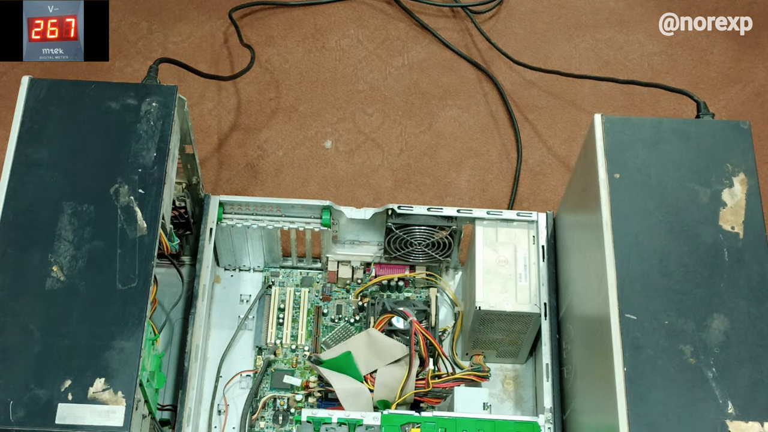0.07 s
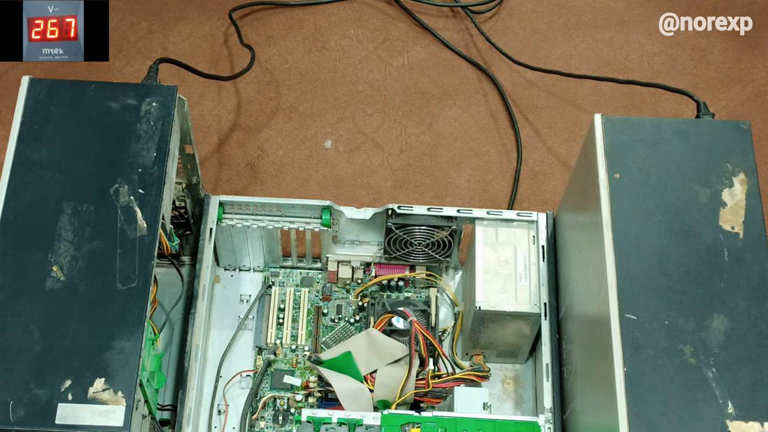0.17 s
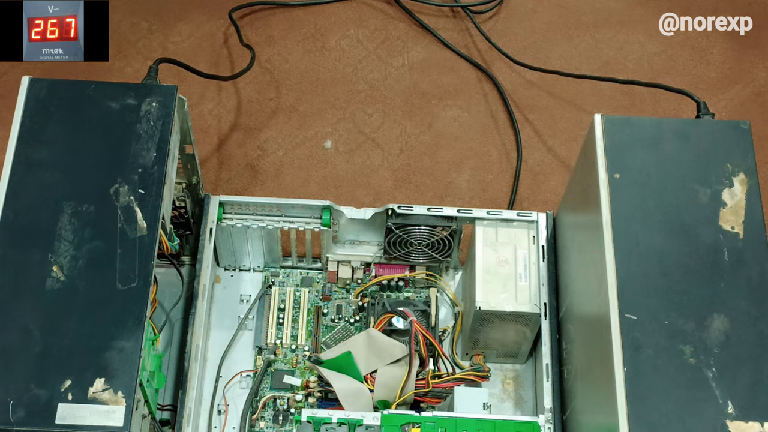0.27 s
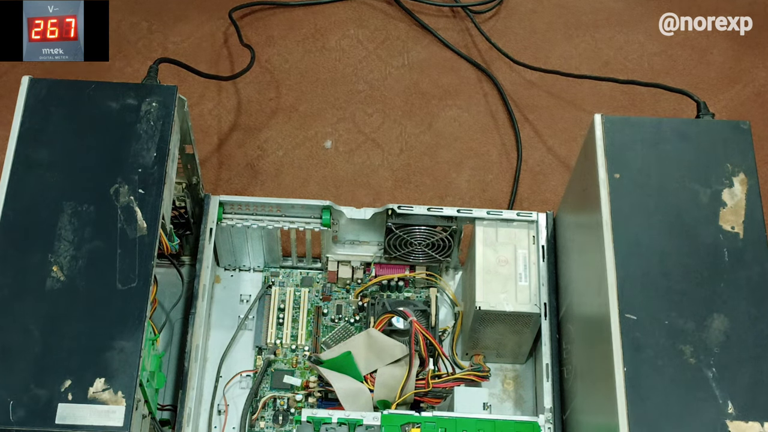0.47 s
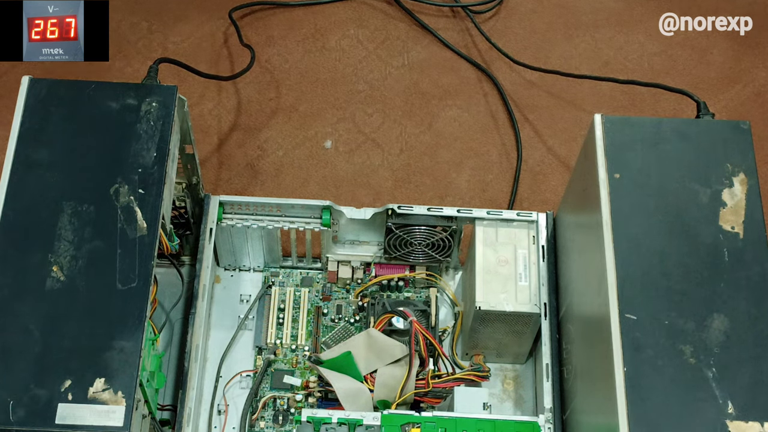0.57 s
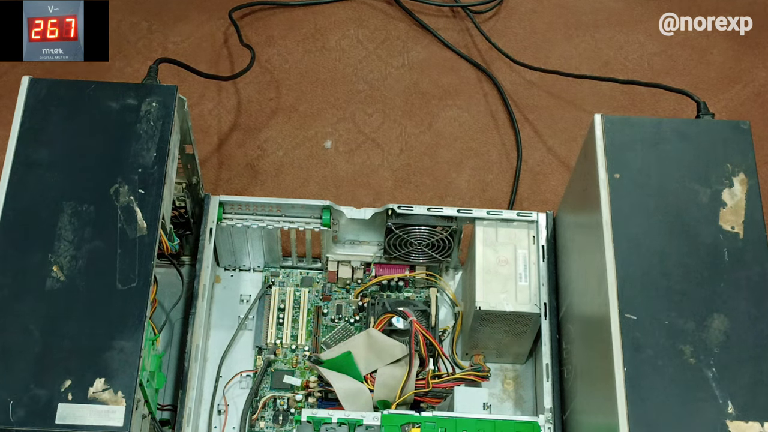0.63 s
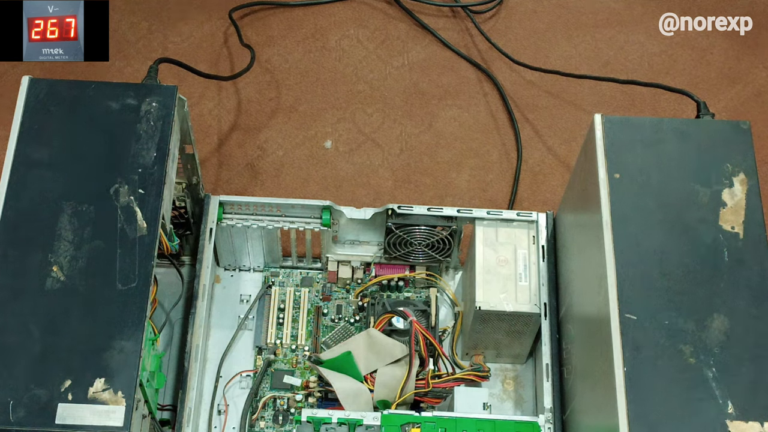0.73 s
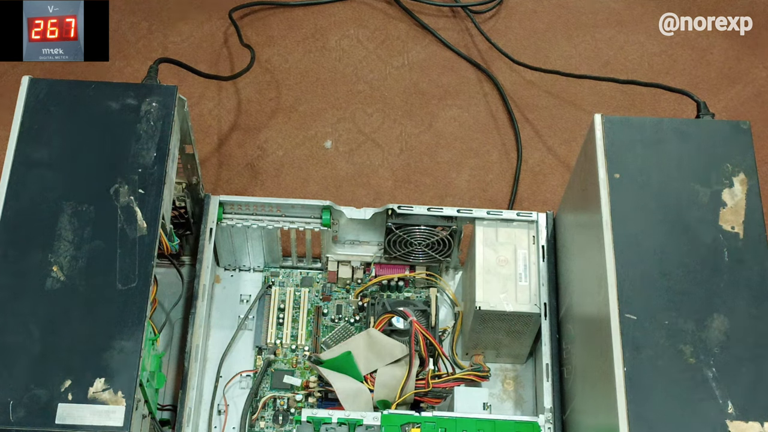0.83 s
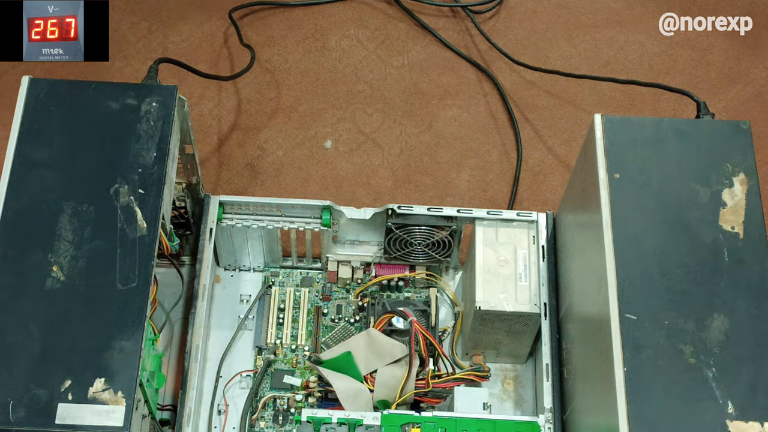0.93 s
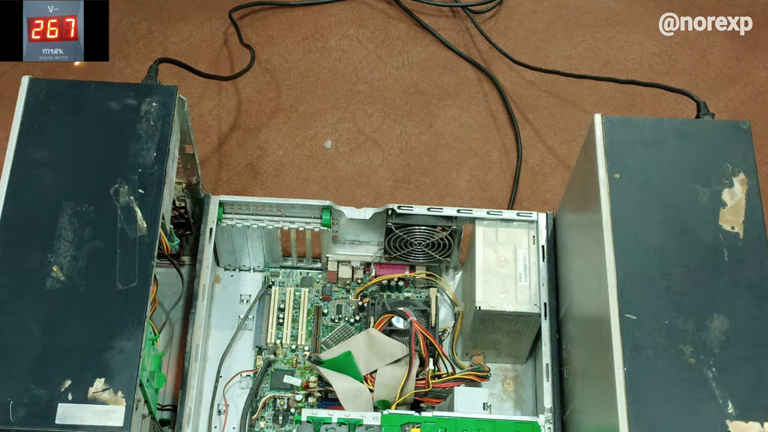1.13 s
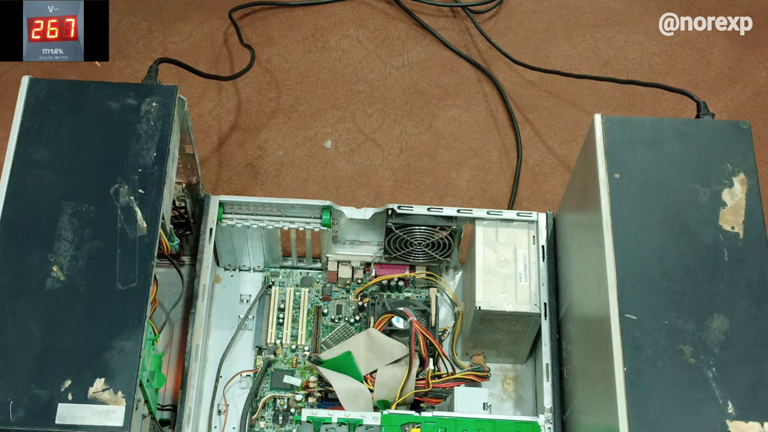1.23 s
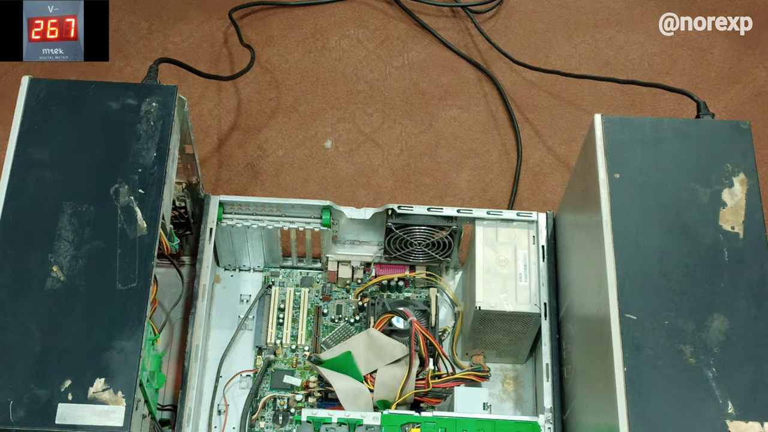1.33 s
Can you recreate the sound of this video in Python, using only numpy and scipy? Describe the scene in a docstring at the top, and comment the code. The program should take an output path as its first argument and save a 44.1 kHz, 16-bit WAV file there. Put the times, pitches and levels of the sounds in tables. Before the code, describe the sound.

A computer power supply blows close by in a small room. A faint hum and sizzle lead to a loud, ragged bang of sparks at 0.25 seconds. A sharp, deeper pop follows at 0.7 seconds, each with a short echo. From about 0.9 to 1.1 seconds a harsh electric buzz sputters, leaving the steel case ringing lightly. The hum is gone by 1.2 seconds.

```python
"""First you hear a hum and a faint sizzle: a computer power supply is failing in its open steel case.
It blows with a ragged bang of quick arcs (electric sparks), then a part bursts with a sharp pop.
A short buzz follows, one arc each mains cycle, and the hum stops. The recorder's limiter turns the
bangs down and recovers while the small room still rings, which draws out their tails."""
import sys
import numpy as np
from scipy import signal
from scipy.fft import rfft, irfft, next_fast_len
from scipy.io import wavfile
from scipy.ndimage import uniform_filter1d, minimum_filter1d

SR = 44100
rng = np.random.default_rng(int(sys.argv[2]) if len(sys.argv) > 2 else 0)


def digitize_waveform(pressure):
    """Quantize a signal to 16-bit integers and store it at the path in sys.argv[1].

    Rows of a 2-D input are taken as channels; values are limited to [-1, 1].
    """
    field = np.atleast_2d(pressure).T
    bounded = np.clip(field, -1, 1)
    quanta = np.round(bounded * 32767).astype(np.int16)
    wavfile.write(sys.argv[1], SR, quanta)


N = 61739

# Arcs of the first bang (time [s], level [dB], fade [s]); a fade is the time to fall by 60 dB
BANG_ARCS = [(0.2476, 18, 0.049), (0.2525, 15.5, 0.065), (0.2728, 13, 0.06), (0.285, 9.5, 0.037)]
# Tone colour of the bang and of its echo (frequency [Hz], level [dB])
BANG_COLOUR = [(29, -66), (50, -42), (263, -11), (406, -12), (543, -1.5), (837, -10), (991, 12),
               (1060, -20), (1230, -21.5), (1320, -24.5), (1530, 5), (1990, -9.5), (2140, 3), (2790, -4.5),
               (3300, 1.5), (5350, -5.5), (6330, -6.5), (13300, -28.5), (15800, -18)]
BANG_ECHO = [(59, -89), (100, -59.5), (201, -42.5), (233, -24.5), (422, -17), (556, -19), (631, -7),
             (905, -14.5), (1100, -5.5), (1410, -8), (1900, -4), (2400, -1.5), (3700, 0.5), (6490, -4.5),
             (9110, -10), (12300, -31.5), (15800, -21.5)]
# Ringing in that echo (pitch [Hz], width [Hz], level [dB])
BANG_RING = [(674, 10, -8), (1130, 26, -1), (1717, 20, 2), (2800, 190, 4.5), (3410, 24, 11),
             (3660, 180, 0.5), (4050, 40, 9.5), (4660, 44, -13.5)]
BANG_S, BANG_LOW_CUT_HZ = BANG_ARCS[0][0], 120
def first_bang():
    """A few arcs in quick succession tear a part open; case and room ring on."""
    blast = noise(BANG_COLOUR) * sum(amp(db) * strike(s, fade) for s, db, fade in BANG_ARCS)
    echo = amp(-11.5) * noise(BANG_ECHO) + amp(-18.5) * ringing_noise(BANG_RING)
    return low_cut(blast, BANG_LOW_CUT_HZ) + room_tail(BANG_S, echo, stretch=0.96)


# Air pushed by the first bang (time [s], level [dB], length [s], bass cut [Hz])
AIR_PUSHES = [(0.2492, 18, 0.00061, 99.5), (0.2532, 21, 0.00084, 94.9), (0.2593, 14, 0.00054, 110),
              (0.307, 17.5, 0.00068, 64.4), (0.3194, 15.5, 0.00063, 62), (0.3293, 0, 0.0015, 58)]
def air_pushes():
    """Each push is a jump of pressure followed by suction."""
    pressure = np.zeros(N)
    for s, db, length, low_hz in AIR_PUSHES:
        age = np.maximum(clock() - s, 0) / length
        pressure += low_cut(amp(db) * (age > 0) * (1 - age) * np.exp(-age), low_hz)
    return high_cut(pressure, corner_hz=1790)


# Tone colour of the pop and of its echo (frequency [Hz], level [dB])
POP_COLOUR = [(29, -76.5), (50, -34.5), (120, -49.5), (230, -28), (690, -2), (944, -26), (1040, -11),
              (1320, 12.5), (1600, -26.5), (1990, -5), (3150, 8.5), (3470, 0), (5220, -3.5), (5750, 0.5),
              (7860, -17.5), (8650, 1.5), (12700, -43), (15800, -4.5)]
POP_ECHO = [(59, -66.5), (100, -30), (254, -17.5), (327, -14), (388, -35.5), (422, -12), (702, -3.5),
            (780, -13.5), (925, 3), (1030, -12.5), (1170, -0.5), (1640, -11), (1940, -4), (5030, -9.5),
            (6490, -6), (12000, -30.5), (15800, -33)]
# Low ringing of the supply's box (pitch [Hz], width [Hz], level [dB])
BOX_RING = [(660, 35, -2.5), (724, 40, 2), (865, 60, -4.5), (1072, 37, -1), (1235, 18, 0), (1347, 56, 2)]
# Clear notes of the box (pitch [Hz], level [dB], fade [s])
BOX_NOTES = [(221, -5.5, 0.11), (314, -3.5, 0.07), (462, 0.5, 0.037), (561, 9, 0.032), (645, 11, 0.047),
             (727, -4.5, .22), (946, -8, .33), (1052, -2, .16), (1196, -7.5, .3), (1287, 0.5, .2)]
def pop(start_s=0.688):
    """One part bursts with a single, deeper pop that rings the supply's box."""
    crack = amp(12) * noise(POP_COLOUR) * strike(start_s, fade_s=0.031)
    box = amp(3.5) * ringing_noise(BOX_RING) * strike(start_s, fade_s=0.19)
    box += ring(start_s, BOX_NOTES)
    echo = amp(-21.5) * noise(POP_ECHO)
    return low_cut(crack + box, BANG_LOW_CUT_HZ) + room_tail(start_s, echo, stretch=0.89)


# Arcs of the buzz; shriek and hiss are relative to the level, body (the low part) to the hiss
# (peak time [s], level [dB], rise [s], fall [s], shriek pitch [Hz], shriek [dB], hiss [dB], body [dB])
BUZZ_ARCS = [(0.897, -40, 0.0078, 0.0026, 2700, -6.5, 5.5, 2.5),
             (0.936, -35, 0.0056, 0.0056, 6800, -3.5, -3, 0.5),
             (0.9517, -31.5, 0.00095, 0.011, 2685, 5.5, 3.5, 2.5),
             (0.9741, -13, 0.0036, 0.004, 4128, -1.5, -7.5, -7),
             (0.995, -13.5, .0042, 0.0035, 4116, -0.5, -6.5, -5.5),
             (1.0135, -15, 0.0043, 0.0042, 5050, -3, -3, 1.5),
             (1.033, -20, 0.0046, 0.0048, 4900, -2, -2, -3),
             (1.05, -24, 0.0065, 0.011, 2345, -8.5, -7.5, 0.5)]
# Tone colour of their hiss (frequency [Hz], level [dB])
HISS_COLOUR = [(29, -65), (60, -19), (148, -31), (202, -24.5), (300, -19.5), (397, -21), (642, -8.5),
               (1140, -14.5), (1420, -10), (1770, -5.5), (2360, -4.5), (3220, -22), (3470, -10), (4100, -6),
               (4520, -13), (8650, -14), (12100, -33), (15800, -18.5)]
# Ringing of the steel case (pitch [Hz], width [Hz], level [dB])
CASE_RING = [(1432, 33, -5.5), (2407, 60, -2.5), (3025, 22, -5), (2850, 48, -7.5), (3513, 48, 2),
             (3730, 22, -10.5), (4300, 130, -5), (4710, 36, -4.5), (5440, 56, -8), (5710, 110, -6.5),
             (6410, 360, -10), (8000, 70, -28), (8330, 100, -11), (9270, 230, -9.5)]
# Lingering notes of the sheet steel (pitch [Hz], level [dB], fade before ring() caps it [s])
STEEL_NOTES = [(2180, -1.5, 0.3), (2406, 7.5, 0.29), (2960, -16, 0.32), (3476, -5.5, 0.37),
               (3550, 7.5, 0.16), (4190, 0, .17), (4350, 0.5, 0.23), (4818, -5, .21), (5179, -3, .18),
               (6767, -3, 0.46)]
def arcing():
    """An arc hisses and shrieks once each mains cycle; the steel rings on after the last strong one."""
    t, buzz = clock(), np.zeros(N)
    hiss = panel_echoes(noise(HISS_COLOUR))
    case = amp(-2) * ringing_noise(CASE_RING)
    body = filtered(hiss, lambda hz: 1 / (1 + (hz / 1300) ** 10))
    for s, db, rise, fall, pitch, shriek_db, hiss_db, body_db in BUZZ_ARCS:
        current = amp(db) * np.exp(-.5 * ((t - s) / np.where(t < s, rise, fall)) ** 2)
        arc_hiss = amp(hiss_db) * (hiss - body + amp(body_db) * body)
        buzz += current * (case + arc_hiss + amp(shriek_db) * shriek(pitch))
    room = room_fade(rng.standard_normal(N), unchanged_s=0, stretch=0.9)
    echo = amp(-7) * signal.fftconvolve(buzz, room / np.linalg.norm(room))[:N]
    steel = amp(-32) * ring(BUZZ_ARCS[-3][0], STEEL_NOTES)
    return buzz + echo + steel


def shriek(pitch_hz, width_hz=220):
    """A rough whistle of even strength whose pitch scatters quickly."""
    band = filtered(rng.standard_normal(N), lambda hz: np.exp(-.5 * ((hz - pitch_hz) / width_hz) ** 2))
    phase = np.angle(signal.hilbert(band, next_fast_len(N))[:N])
    return unit(np.cos(phase))


# The supply's hum notes, and the colours of its air noise and sizzle (frequency [Hz], level [dB])
HUM_NOTES = [(193.8, -62), (247.6, -59), (301.5, -59), (355.3, -70)]
AIR_COLOUR = [(30, -28), (110, 1.5), (250, 3.5), (450, -2), (700, 0.5), (1200, -7.5), (2500, -11),
              (5000, -15.5), (9000, -29.5), (12000, -47.5)]
SIZZLE_COLOUR = [(500, -28.5), (3000, -5.5), (6500, -10), (9300, -4), (11000, -33), (15800, -30)]
def supply(tick_s=0.085, off_s=1.23, fade_out_s=0.1):
    """Throbbing hum and air noise last until the power goes; a tick and sizzle lead up to the bang."""
    t = clock()
    intact = t < BANG_S
    hum = tones(HUM_NOTES) * np.where(intact, 1, amp(-12))  # weaker after the first bang
    air = amp(-60) * noise(AIR_COLOUR)
    power = np.clip((off_s - t) / fade_out_s, 0, 1)
    tick = amp(-61.5) * strike(tick_s, fade_s=0.024)
    sizzle = amp(-72.5) * (t > tick_s) * intact
    return (hum + air) * power + noise(SIZZLE_COLOUR) * (tick + sizzle)


def panel_echoes(x, count=14, spread_s=0.022, share=0.45):
    """Quick reflections between the steel panels make a sound hollow."""
    delays, signs = rng.uniform(0, spread_s, count), rng.choice([-1, 1], count)
    echoes = sum(sign * delayed(x, s) for s, sign in zip(delays, signs))
    return (x + share * echoes / np.sqrt(count)) / np.hypot(1, share)


# How long the room rings (frequency [Hz], fade [s])
ROOM_FADES = [(150, 0.38), (700, 0.33), (3000, .35), (7000, 0.35), (13000, 0.28)]
def room_fade(x, unchanged_s, stretch, rise_s=0.004):
    """Sound builds up, then dies away band by band; stretch scales the room's fade times."""
    hz, t, bands = signal.stft(x, SR, nperseg=256)
    fade_s = stretch * along(ROOM_FADES, hz)[:, None]
    tail = signal.istft(bands * amp(-60 * (t - unchanged_s) / fade_s), SR, nperseg=256)[1][:N]
    return tail * (1 - np.exp(-clock() / rise_s))


def room_tail(start_s, sound, stretch):
    """The room's fading answer to a bang."""
    return delayed(room_fade(panel_echoes(sound), unchanged_s=0.15, stretch=stretch), start_s)


# The quiet room's noise colour and hum notes (frequency [Hz], level [dB])
QUIET_COLOUR = [(18, -50), (30, -25), (117, -6.5), (251, -7.5), (413, -8), (612, -9), (2330, -13.5),
                (3280, -15.5), (6480, -16.5), (15800, -38.5)]
QUIET_HUM = [(96.9, -87.5), (193.8, -87), (430.7, -94.5), (516.8, -77.5)]
def quiet_room():
    """A faint, steady rush and hum behind everything."""
    return amp(-69) * noise(QUIET_COLOUR) + tones(QUIET_HUM)


def amp(db):
    """Decibels as a multiplier."""
    return 10 ** (np.asarray(db) / 20)


def unit(x):
    """Scale to an average strength (rms) of 1."""
    return x / np.sqrt(np.mean(x ** 2) + 1e-20)


def clock():
    """Each sample's time in seconds."""
    return np.arange(N) / SR


def delayed(x, seconds):
    """The same sound, later."""
    return np.pad(x, (round(seconds * SR), 0))[:N]


def along(points, hz):
    """Read between a table's rows on a log frequency scale."""
    freqs, values = np.transpose(points)
    return np.interp(np.log(hz + 1), np.log(freqs + 1), values)


def filtered(x, response):
    """Multiply each frequency in x by response(hz)."""
    size = next_fast_len(N + 8192)
    return irfft(rfft(x, size) * response(np.fft.rfftfreq(size, 1 / SR)), size)[:N]


def low_cut(x, corner_hz):
    """Cut the bass steeply."""
    return filtered(x, lambda hz: (hz ** 2 / (hz ** 2 - corner_hz ** 2 - 1j * hz * corner_hz)) ** 2)


def high_cut(x, corner_hz):
    """Soften the treble."""
    return filtered(x, lambda hz: 1 / (1 + 1j * hz / corner_hz))


def band_limit(hz, top_hz=16000):
    """A steep cut of the very highest treble."""
    return np.clip((top_hz + 200 - hz) / 400, 0, 1) ** 2


def noise(colour):
    """Noise of strength 1 in the given tone colour."""
    return unit(filtered(rng.standard_normal(N), lambda hz: band_limit(hz) * amp(along(colour, hz))))


def ringing_noise(peaks):
    """Noise of strength 1 that rings around the given pitches."""
    def response(hz):
        ringing = sum((-1) ** k * amp(db) * 1j * hz * width / (pitch ** 2 - hz ** 2 + 1j * hz * width)
                      for k, (pitch, width, db) in enumerate(peaks))
        return ringing / (1 + (hz / 9500) ** 12)
    return unit(filtered(rng.standard_normal(N), response))


def strike(start_s, fade_s):
    """A level that jumps up, then falls 60 dB in fade_s."""
    age = clock() - start_s
    return (age >= 0) * amp(-60 * np.abs(age) / fade_s)


def ring(start_s, notes, longest_s=0.36):
    """Notes struck together, each fading away."""
    age = clock() - start_s
    return sum(amp(db) * strike(start_s, min(fade, longest_s)) * np.cos(2 * np.pi * hz * age)
               for hz, db, fade in notes)


def tones(notes, crest_s=0.009):
    """Steady notes that throb against each other, all in step at crest_s."""
    return np.sqrt(2) * sum(amp(db) * np.cos(2 * np.pi * hz * (clock() - crest_s)) for hz, db in notes)


def scene():
    """All sources over the quiet of the room, in one channel."""
    background = quiet_room()
    return (first_bang() + pop() + air_pushes() + arcing() + supply() + background)[None]


def limiter(x, limit_db=-15, sense_s=0.006, ahead_s=0.006, hold_s=0.038, release_db_per_s=138.5):
    """The volume drops just ahead of a loud sound, holds, then climbs back steadily."""
    sensed = high_cut(x, corner_hz=2500)  # it reacts less to treble
    level_db = 10 * np.log10(np.abs(uniform_filter1d(sensed ** 2, int(sense_s * SR))) + 1e-12)
    cut_db = np.minimum(limit_db - level_db, 0)
    ahead, span = int(ahead_s * SR), int((ahead_s + hold_s) * SR)
    held_db = minimum_filter1d(cut_db, span, origin=span // 2 - ahead - 1, mode="nearest")
    climb_db = release_db_per_s * clock()
    gain_db = np.minimum.accumulate(held_db - climb_db) + climb_db
    return x * amp(uniform_filter1d(gain_db, ahead))


def record(dry):
    """The recorder turns down the bangs, rounds off their peaks and cuts the highest treble."""
    limited, ceiling = limiter(dry[0]), 0.72
    rounded = limited / (1 + (limited / ceiling) ** 6) ** (1 / 6)
    return filtered(rounded, band_limit)[None]


dry = scene()
out = record(dry)
digitize_waveform(out)
```